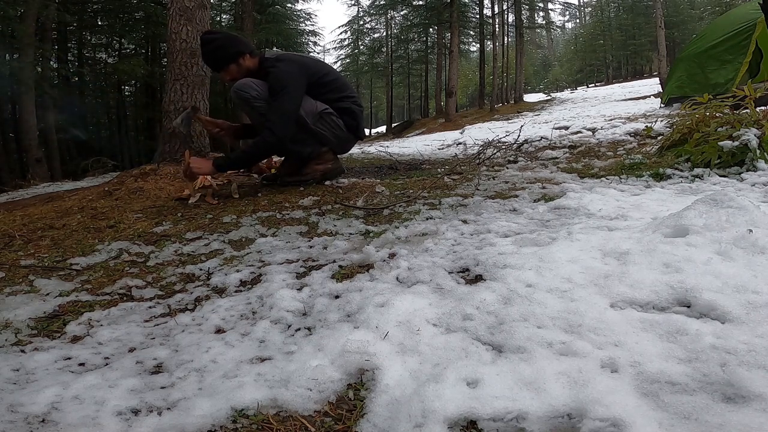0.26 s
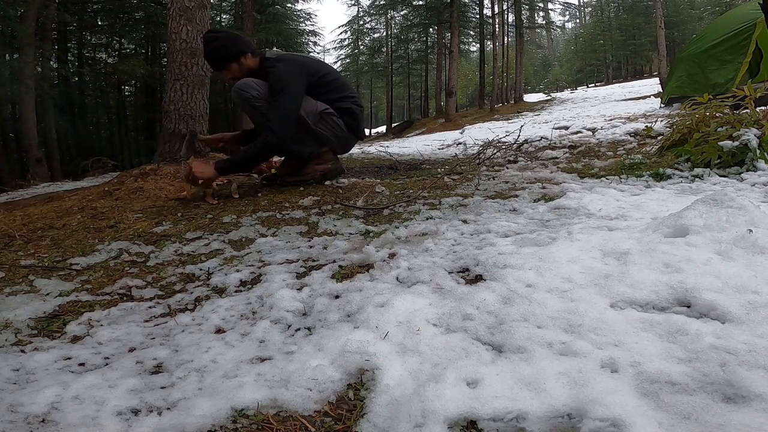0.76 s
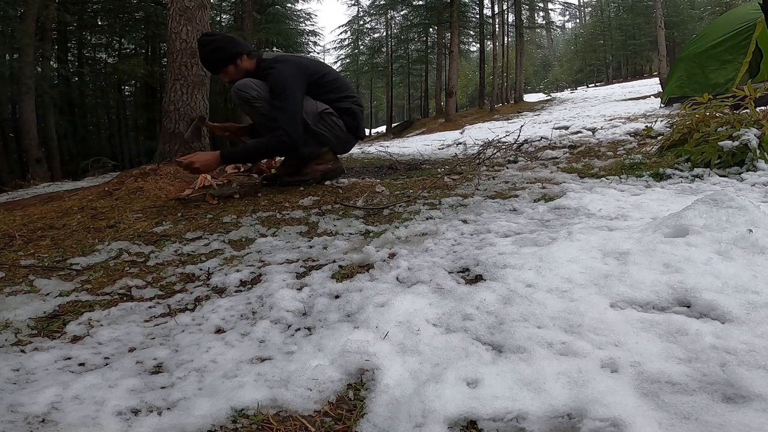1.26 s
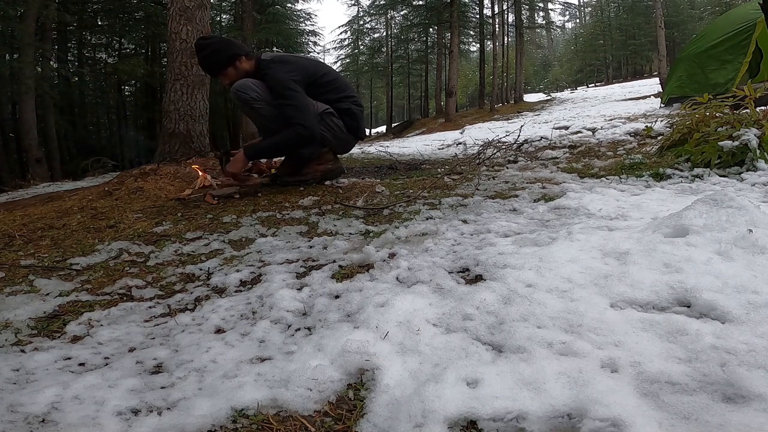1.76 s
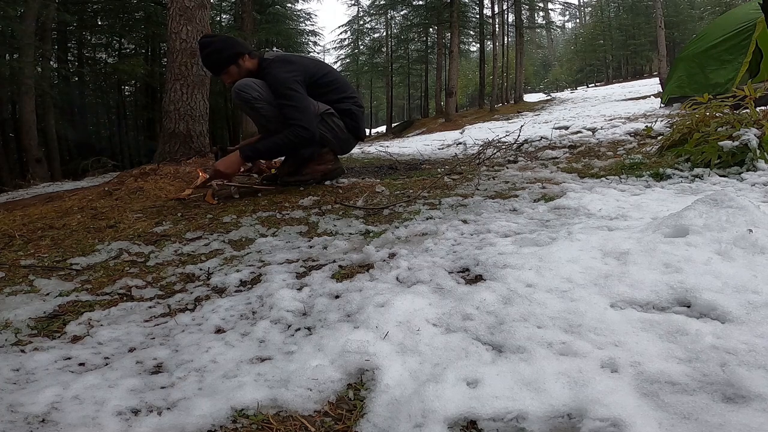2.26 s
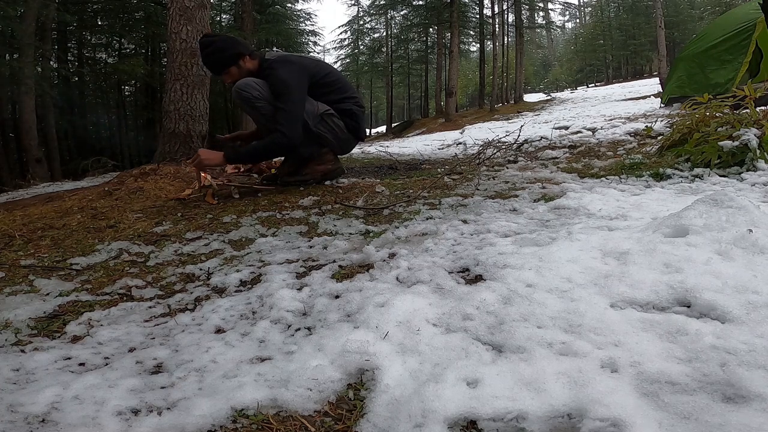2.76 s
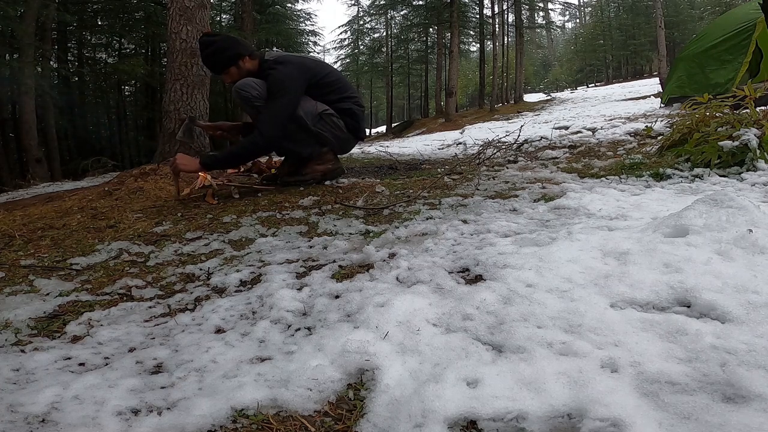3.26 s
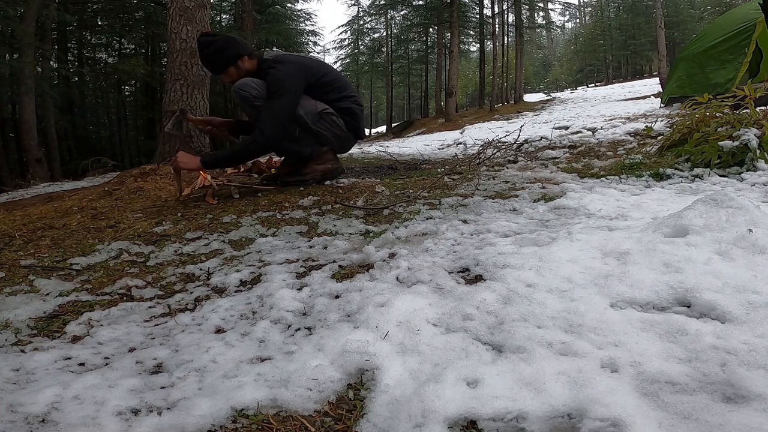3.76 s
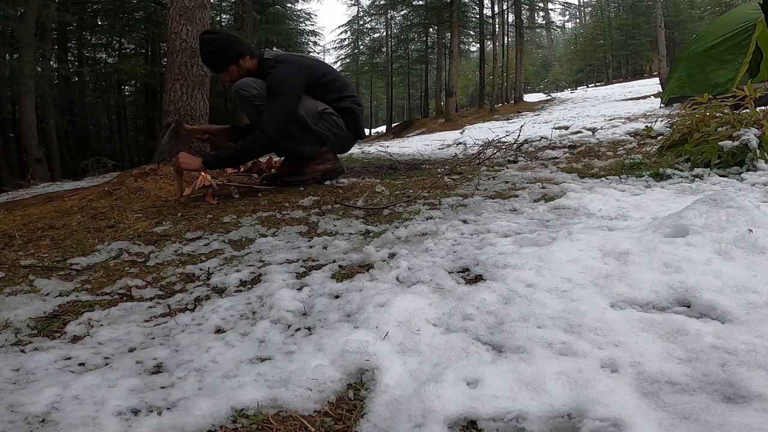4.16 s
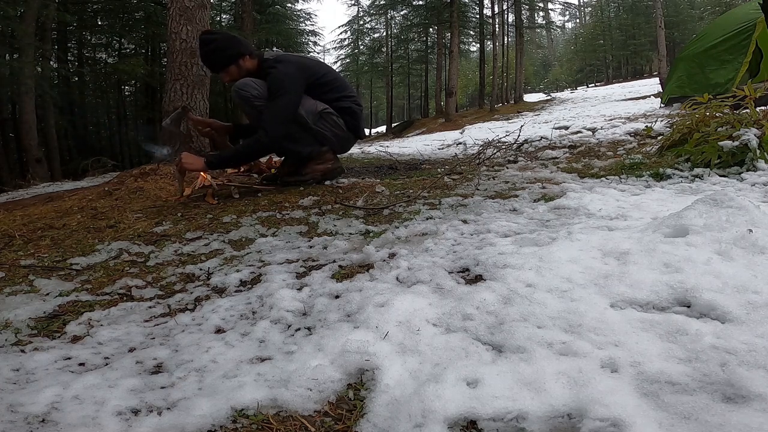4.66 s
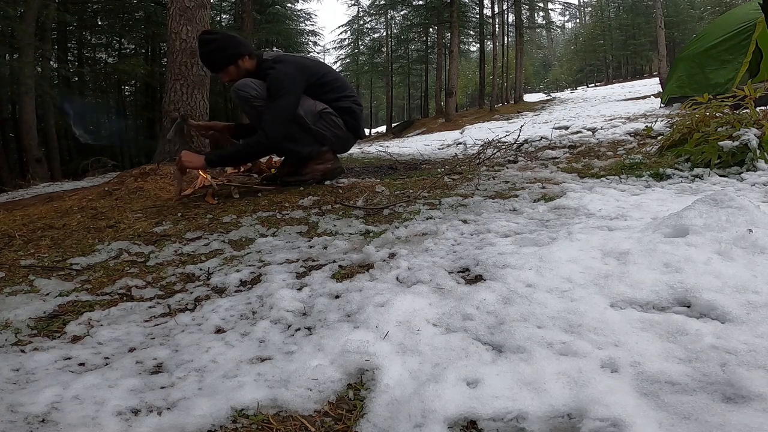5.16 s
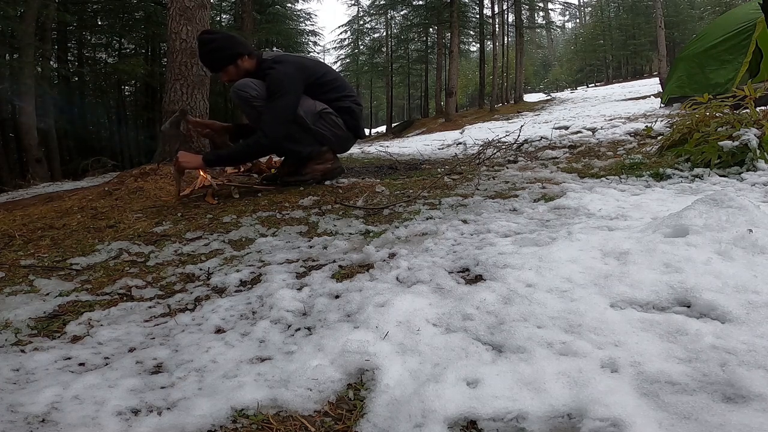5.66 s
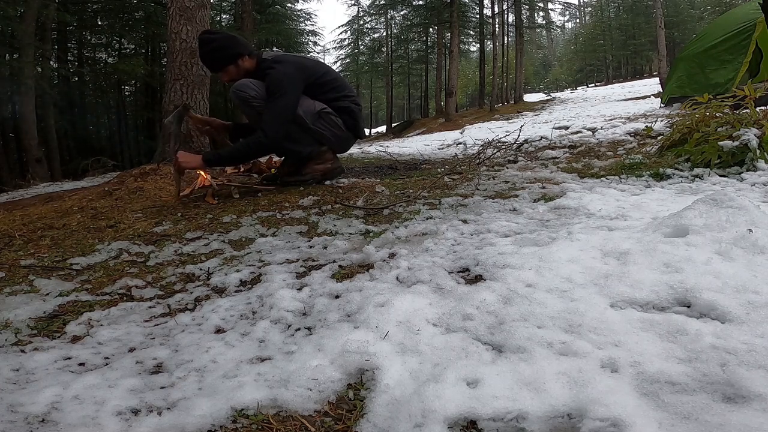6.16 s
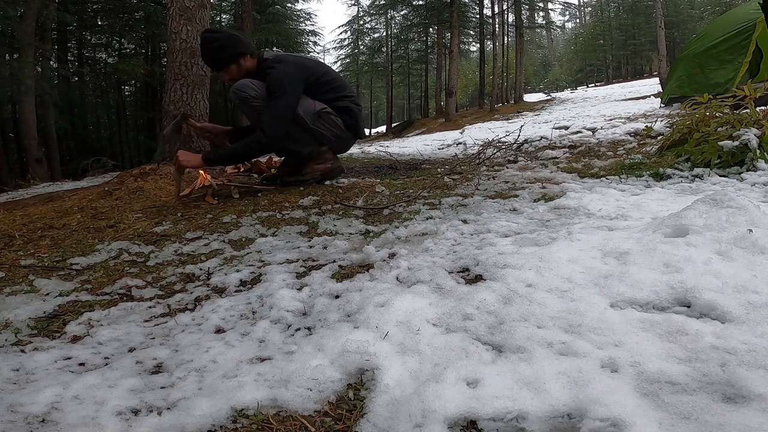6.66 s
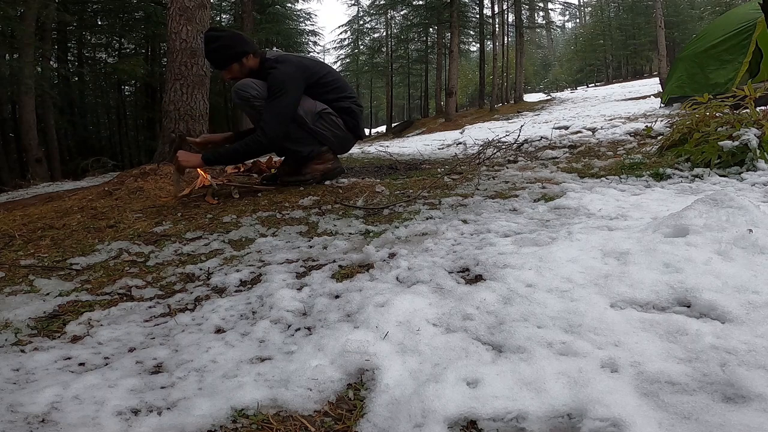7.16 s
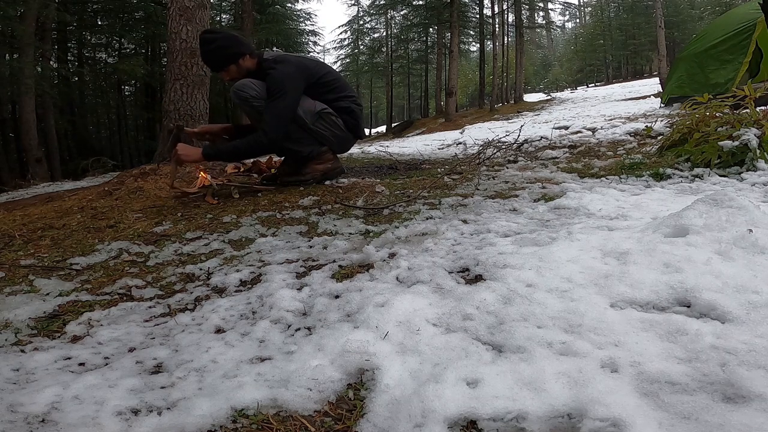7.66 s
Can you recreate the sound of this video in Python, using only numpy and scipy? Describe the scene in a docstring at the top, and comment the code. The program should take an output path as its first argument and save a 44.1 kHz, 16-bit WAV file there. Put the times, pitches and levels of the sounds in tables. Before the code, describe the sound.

Someone chops and snaps dry sticks a few steps from a small stereo microphone in a forest. Sharp cracks with low thumps come early, then a quieter stretch of small ticks and rustling twigs, then a stronger run of blows to the end. Trunks return a brief diffuse echo. A bird chirps briefly, another calls faintly far off, over low wind and rumble.

```python
"""Forest floor: dry sticks are chopped and snapped a few steps from a small two-port microphone.
Each blow is a cluster of filtered noise cracks over damped sine thumps; loose wood knocks and blade or
knocked wood rings high, both in damped modes; gritty noise rustles, faint small cracks and ticks fall
between, and the trunks return a haze of diffuse noise. A near bird chirps in swept sines, a far one in
narrow noise, over wind, low rumble and faint hiss."""
import sys
import numpy as np
from scipy import signal
from scipy.fft import rfft, irfft, next_fast_len
from scipy.io import wavfile
from scipy.ndimage import uniform_filter1d

SR = 44100
rng = np.random.default_rng(int(sys.argv[2]) if len(sys.argv) > 2 else 0)


def unload_wav(signal):
    """Save mono or channel-first audio to the path in sys.argv[1] as 16-bit WAV at rate SR, clipped to [-1, 1]."""
    wavfile.write(
        sys.argv[1],
        SR,
        np.round(np.clip(np.atleast_2d(signal).T, -1, 1) * 32767).astype(np.int16),
    )


N = 349272

# left-right likeness of diffuse sound: freq_hz, likeness (0 to 1)
LIKENESS = [(60, 1), (180, 0.97), (550, 0.43), (1650, 0.087), (4970, 0.052), (15000, 0.045)]
# spectrum of splintering fibres: freq_hz, relative_level_db (per Hz)
SPLINTER_COLOUR = [(2200, -17), (3200, -2.5), (4300, -9), (5300, -4), (6200, -8.5), (7500, -5), (8500, -18),
                   (11000, -12.5), (13000, -25.5), (15000, -41), (16500, -56)]
# spectrum of the woody knock: freq_hz, relative_level_db (per Hz)
KNOCK_COLOUR = [(200, -17.5), (400, 7.5), (1000, -2.5), (2000, -1.5), (2800, -5.5), (3800, -22),
                (8000, -66)]


def gain_of(db):
    """Decibels to amplitude."""
    return 10 ** (np.asarray(db) / 20)


def evened(x):
    """Scales to rms 1."""
    return x / np.sqrt(np.mean(x ** 2) + 1e-20)


def read(points, hz):
    """Reads a table on a log-frequency axis."""
    f, value = np.transpose(points)
    return np.interp(np.log(hz + 1), np.log(f + 1), value)


def add(mix, start_s, sound):
    """Mixes a sound in at start_s."""
    part = mix[round(start_s * SR):][:len(sound)]
    part += sound[:len(part)]


def smoothed(x, bins, frames):
    """Random (frequency, time) grid averaged over bins and frames, rms 1."""
    return evened(uniform_filter1d(uniform_filter1d(x, size=bins, axis=0), size=frames, axis=1))


def coloured(x, db):
    """Filters by a dB curve over rfft bins, minimum phase so nothing sounds early; white noise keeps its rms."""
    log_gain = np.log(gain_of(np.maximum(np.r_[db, db[-2:0:-1]], -100)))
    response = np.exp(np.conj(signal.hilbert(log_gain)))[:len(db)]
    return irfft(rfft(x) * response / np.sqrt(np.mean(abs(response) ** 2)), len(x))


def around(hz, centre_hz, per_octave_db, least_db):
    """A broad hump in dB about a centre, falling with octaves squared."""
    return np.maximum(-per_octave_db * np.log2((hz + 1) / centre_hz) ** 2, least_db)


def diffuse_pair(hz, frames):
    """Random stereo spectra whose left-right likeness follows frequency."""
    a, b, c, d = rng.standard_normal((frames, len(hz), 4)).T
    same = np.clip(read(LIKENESS, hz), -1, 1)[:, None]
    left, other = a + 1j * b, c + 1j * d
    return np.array([left, same * left + np.sqrt(1 - same ** 2) * other])


def background(colour, level, size, patchy_db):
    """Random short-time spectra with drifting patches, following a slow level."""
    frames, hz = N // (size // 4) + 5, np.fft.rfftfreq(size, 1 / SR)
    patches = smoothed(rng.standard_normal((len(hz), frames)), bins=10, frames=8)
    spectra = diffuse_pair(hz, frames) * gain_of(read(colour, hz)[:, None] + patchy_db * patches)
    noise = evened(signal.istft(spectra, nperseg=size, noverlap=size * 3 // 4)[1][:, :N])
    return noise * gain_of(np.interp(np.arange(N) / SR, *np.transpose(level)))


def hiss():
    """Faint hiss: broadband diffuse noise with a slowly moving level."""
    # time_s, level_db
    level = [(0.0, -69.5), (0.86, -71), (1.042, -66), (1.2, -71.5), (2.0, -71), (3.2, -70.5), (4.899, -72),
             (5.9, -73), (6.599, -70.5), (7.92, -73)]
    # freq_hz, relative_level_db (per Hz)
    colour = [(350, -26.5), (600, -6.5), (700, -10), (817, -8.5), (1250, -8.5), (2540, -18), (3590, -18.5),
              (5150, -18), (7100, -13.5), (8610, -27.5), (11600, -30), (13000, -54)]
    return background(colour, level, size=512, patchy_db=1.4)


def rumble():
    """Low rumble: diffuse noise concentrated in the bass."""
    # time_s, level_db
    level = [(0.0, -53.5), (1.56, -56), (1.94, -54), (3.62, -55.5), (4.08, -53.5), (5.56, -55.5),
             (6.17, -54), (6.42, -55.5), (7.92, -56.5)]
    # freq_hz, relative_level_db (per Hz)
    colour = [(65, -35.5), (110, -1), (243, -6), (275, -15), (380, -14), (611, -25), (697, -26.5),
              (900, -43.5), (1170, -65), (1980, -120)]
    return background(colour, level, size=1024, patchy_db=2.0)


def wind():
    """Wind on the housing: deep bass noise that swells in gusts."""
    # time_s, level_db
    level = [(0.0, -53.5), (0.3, -60), (0.789, -53), (1.501, -60.5), (1.96, -52.5), (2.38, -56.5),
             (2.8, -52), (3.502, -51.5), (4.41, -49), (4.76, -55), (5.43, -60.5), (5.67, -57),
             (6.089, -46.5), (6.46, -63), (6.7, -48), (7.1, -53), (7.68, -54.5), (7.92, -52)]
    # freq_hz, relative_level_db (per Hz)
    colour = [(12, -38.5), (20, -7.5), (36, -1), (59, 5.5), (77, -1.5), (120, -11.5), (160, -38.5),
              (260, -120)]
    return background(colour, level, size=2048, patchy_db=-0.5)


def far_bird():
    """Far calls smeared by the trees: narrow noise with a fluttering level."""
    # start_s, length_s, level_db, centre_hz, width_hz
    calls = [(0.123, 0.23, -76.5, 2780, 300), (4.605, 0.26, -83.5, 3080, 608),
             (6.331, 0.18, -75.5, 2990, 499), (6.995, 0.28, -78, 3000, 685), (7.731, 0.077, -83, 2700, 120)]
    out = np.zeros(N)
    for start_s, length_s, level_db, centre_hz, width_hz in calls:
        edges_hz = [centre_hz - width_hz / 2, centre_hz + width_hz / 2]
        band = signal.butter(2, edges_hz, "band", fs=SR, output="sos")
        noise = signal.sosfilt(band, rng.standard_normal(SR))[2000:][:round(length_s * SR)]
        flutter = evened(uniform_filter1d(rng.standard_normal(len(noise)), size=900))
        noise = evened(noise * gain_of(1.4 * flutter))
        add(out, start_s, gain_of(level_db) * noise * signal.windows.tukey(len(noise), .6))
    return out


def near_bird():
    """Short rising-falling whistles: a sine swept along one pitch and level contour."""
    # start_s, level_db, peak_pitch_hz
    chirps = [(1.806, -53.5, 3033.5), (3.806, -55, 3108), (5.502, -56, 3095), (7.254, -56, 3055)]
    # contour of every chirp: time_s (after start), pitch_ratio (to peak pitch), level_db (added)
    contour = [(0, .72, -24), (.005, .82, -7), (.014, .885, 0), (.021, 1.0, -9), (.030, .985, -12),
               (.038, .95, -24), (.048, .88, -9), (.058, .74, -24)]
    out = np.zeros(N)
    time_s, pitch_ratio, contour_db = np.transpose(contour)
    t = np.arange(0, time_s[-1], 1 / SR)
    for start_s, level_db, peak_hz in chirps:
        turns = np.cumsum(peak_hz * np.interp(t, time_s, pitch_ratio)) / SR
        level = gain_of(level_db + np.interp(t, time_s, contour_db))
        add(out, start_s, level * np.sin(2 * np.pi * turns))
    return out


def forest(x, blur, longer):
    """Echoes off many trunks: diffuse noise whose power follows the source, builds over some ms, dies by band."""
    # freq_hz, t60_s (before the factor longer)
    decay = [(150, 0.36), (700, 0.055), (2000, 0.21), (5000, 0.31), (12000, 0.23)]
    # freq_hz, level_db
    colour = [(100, -27.5), (400, -21), (1000, -21.5), (3000, -12), (6000, -18), (12000, -10)]
    hz, _, z = signal.stft(x, SR, nperseg=256, noverlap=192)
    step_s, build_s = 64 / SR, 0.0027
    fall = gain_of(-120 * step_s / (longer * read(decay, hz)))  # acts on power: 60 dB per t60
    build = np.exp(-step_s / build_s)
    power = uniform_filter1d(abs(z) ** 2, size=blur, axis=0)
    power = signal.lfilter([0, 0, 0, 1 - build], [1, -build], power, axis=1)  # three frames late
    power = np.array([signal.lfilter([1 - f], [1, -f], p) for f, p in zip(fall, power)])
    trunks = smoothed(rng.standard_normal(power.shape), bins=24, frames=2)  # single trunks flash wide
    patches = smoothed(rng.standard_normal(power.shape), bins=5, frames=30)  # some bands linger
    grain_db = 3.0 * trunks + 2.5 * patches
    spectra = diffuse_pair(hz, power.shape[1])
    spectra *= np.sqrt(abs(power)) * gain_of(read(colour, hz)[:, None] + grain_db)
    return signal.istft(spectra, SR, nperseg=256, noverlap=192)[1][:, :N]


def rings(rows, rise_s):
    """Damped sine swings that start inwards, each cut at a quarter second."""
    out, t = np.zeros(N), np.arange(SR // 4) / SR
    for start_s, level_db, hz, t60_s in rows:
        envelope = gain_of(level_db - 60 * t / t60_s) * (1 - np.exp(-t / rise_s))
        add(out, start_s, -envelope * np.sin(2 * np.pi * hz * t))
    return out


def struck(modes, hits):
    """A set of damped modes, rung by each hit at its own strengths."""
    rows = []
    for start_s, *levels_db in hits:
        rows += [(start_s, level_db, *mode) for level_db, mode in zip(levels_db, modes)]
    return rings(rows, rise_s=0.00072)


def high_rings():
    """High rings of blade and knocked wood: three damped modes."""
    # freq_hz, t60_s
    modes = [(4050, 0.41), (5240, 0.012), (6810, 0.19)]
    # start_s, then level_db of each mode before rise and decay
    hits = [(.895, -61.5, -70, -75.5), (1.051, -78, -39, -75), (6.056, -75, -70, -64),
            (6.492, -78, -50, -48), (7.333, -77, -15, -59.5)]
    return struck(modes, hits)


def loose_piece():
    """A loose piece of wood, knocked at different spots, so its three modes vary in strength."""
    # freq_hz, t60_s
    modes = [(770, 0.092), (905, 0.078), (2080, 0.043)]
    # start_s, then level_db of each mode before rise and decay
    hits = [(.9365, -50, -65, -56), (1.052, -66, -39.5, -60), (1.0775, -43, -51, -37),
            (1.1215, -70, -70, -48), (1.9185, -45, -44, -65), (1.995, -58, -62, -56),
            (2.166, -65, -64, -54), (5.005, -49, -50, -32), (7.329, -53, -33, -41)]
    return struck(modes, hits)


def rustles():
    """Twigs and bark scraping as they shift: gritty noise in wood colours, fading as the pieces settle."""
    # start_s, length_s (to -19 dB), level_db, splinter_over_knock_db, knock_centre_hz
    scrapes = [(1.054, 0.071, -62, -17.5, 1510), (1.455, 0.068, -75, 4, 1500),
               (1.91, 0.066, -59.5, -7.5, 1500), (1.987, 0.024, -54, -18, 1800),
               (2.171, 0.085, -61.5, -19, 860), (2.406, 0.24, -88, -1, 1200),
               (2.857, 0.087, -81, 2.5, 1197), (4.158, 0.069, -67.5, -4, 803),
               (5.309, 0.024, -75.5, 1.5, 1210)]
    size, rise_s = 8192, 0.0076
    out, hz, t = np.zeros(N), np.fft.rfftfreq(size, 1 / SR), np.arange(size) / SR
    for start_s, length_s, level_db, bright_db, knock_hz in scrapes:
        noise, lumps = rng.standard_normal((2, size))
        grit = evened(noise * gain_of(3.3 * evened(uniform_filter1d(lumps, size=60))))
        grit = grit * (1 - np.exp(-t / rise_s)) * gain_of(level_db - 19.0 * (t / length_s) ** 2)
        knock = coloured(grit, read(KNOCK_COLOUR, hz) + around(hz, knock_hz, 13.0, -6.0))
        splinter = coloured(grit, read(SPLINTER_COLOUR, hz))
        add(out, start_s, knock + gain_of(bright_db) * splinter)
    return out


def thumps():
    """Each blow swings the stick low and an overtone above; the ground answers a moment later."""
    # sticks lying on the ground, levels before rise and decay:
    # start_s, level_db, pitch_hz, t60_s, overtone_db, ground_db
    blows = [(0.0932, -18, 234, 0.041, -90, -24), (.4818, -15.5, 217, 0.059, -62, -28),
             (.876, -25.5, 142, 0.07, -26, -47), (1.966, -33.5, 243, 0.048, -66, -55),
             (4.162, -26, 246.6, 0.025, -54.5, -37), (4.5554, -15.5, 186, 0.024, -43, -23),
             (5.006, -17, 137.4, 0.043, -19.5, -46.5), (5.018, -24, 197, 0.032, -40, -50),
             (5.569, -42.5, 273, 0.044, -35, -40), (5.576, -26, 107, .05, -50, -27),
             (6.041, -16, 129.7, 0.059, -25, -32), (6.48, -11, 129, 0.02, -41, -21),
             (6.8871, -7.5, 191.7, 0.034, -18, -37), (6.9, -27.5, 112, .1, -48, -53),
             (7.3276, -15, 266, 0.032, -25, -49.5), (7.332, -8.5, 212, 0.047, -16.5, -29.5)]
    overtone_ratio, overtone_t60_ratio = 2.3, 0.53
    ground_hz, ground_t60_s, ground_lag_s = 65, 0.061, 0.0098
    rows = []
    for start_s, level_db, hz, t60_s, overtone_db, ground_db in blows:
        rows += [(start_s, level_db, hz, t60_s),
                 (start_s, overtone_db, hz * overtone_ratio, t60_s * overtone_t60_ratio),
                 (start_s + ground_lag_s, ground_db, ground_hz, ground_t60_s)]
    return rings(rows, rise_s=0.00044)


def crack(splinter_db, knock_db, fall_ms, splinter_hz, knock_hz):
    """A lumpy splinter noise burst and a lower knock, starting together and falling 11 dB in fall_ms."""
    size, rise_ms = 2048, 0.54
    hz, t_ms = np.fft.rfftfreq(size, 1 / SR), np.arange(size) / SR * 1000
    splinter, knock, lumps = rng.standard_normal((3, size))
    shape = (1 - np.exp(-t_ms / rise_ms)) * gain_of(-11.0 * (t_ms / max(fall_ms, .5)) ** 1.2)
    lumps = gain_of(4.05 * evened(uniform_filter1d(lumps, size=24)))  # fibres let go unevenly
    splinter_curve_db = read(SPLINTER_COLOUR, hz) + around(hz, splinter_hz, 14.0, -13.0)
    knock_curve_db = read(KNOCK_COLOUR, hz) + around(hz, knock_hz, 4.5, -13.5)
    splinter = coloured(shape * lumps * splinter, splinter_curve_db)
    knock = coloured(shape * knock, knock_curve_db)
    return gain_of(splinter_db) * splinter + gain_of(knock_db) * knock


def ticks():
    """Faint small cracks and ticks at random times, few of them loud."""
    count, base_db, spread_db, fall_ms = 300, -71.5, 3.5, 0.81
    out = np.zeros(N)
    for when, size, tone, dull in rng.random((count, 4)):
        splinter_db = base_db - spread_db * np.log(size + .02)
        knock_db = splinter_db - 8.5 + 12.0 * dull
        tick = crack(splinter_db, knock_db, fall_ms, 4000 + 3500 * tone, 600 + 1400 * dull)
        add(out, when * N / SR, tick)
    return out


def cracks():
    """Wood fibres breaking: one noise burst a crack, clustered at the blows."""
    # start_s, splinter_db, knock_db, fall_ms, splinter_centre_hz, knock_centre_hz
    breaks = [(0.09, -39.5, -32, 4.8, 5750, 1260), (0.0958, -38.5, -54, 3.9, 5040, 630),
              (0.209, -54.5, -60, 3.9, 3140, 1960), (0.375, -55, -73, 1.8, 4900, 770),
              (0.428, -49, -72, 1.5, 6800, 530), (0.479, -23.5, -22.5, 2.9, 4940, 1240),
              (0.484, -22, -26, 2.2, 5660, 1250), (0.4873, -24.5, -27, 3.3, 5540, 875),
              (0.540, -45, -60, 1.7, 7150, 1500), (0.7195, -37, -67, 1.05, 6150, 980),
              (0.732, -46.5, -52.5, 2.3, 5140, 1150), (0.857, -58, -51, 2.9, 3500, 920),
              (0.867, -39, -38, 1.1, 3500, 1210), (0.8732, -39.5, -30.5, 9.4, 4100, 1170),
              (0.8778, -16, -18, 2.7, 5060, 1860), (0.936, -42.5, -48, 1.8, 7000, 1520),
              (1.049, -33, -32, 5.4, 4540, 1400), (1.077, -48, -33, 4.4, 3940, 1760),
              (1.1097, -50.5, -58, 2.3, 3700, 2300), (1.1214, -74, -51.5, 4.2, 4460, 1730),
              (1.1824, -73, -48.5, 1.9, 3670, 1950), (1.2674, -53.5, -52, 2.1, 4260, 1218),
              (1.4488, -40.5, -56, 1.95, 5500, 1750), (1.5948, -60, -72.5, 2.1, 9500, 570),
              (1.7245, -54, -52, 2.8, 8360, 970), (1.784, -56, -52.5, 1.9, 5900, 1330),
              (1.9172, -47.5, -37.5, 4.5, 5700, 1264), (1.9638, -55, -73, 3.5, 6600, 620),
              (1.9864, -64, -53, 4.3, 4040, 860), (2.1161, -56.5, -52, 2.7, 4830, 1323),
              (2.1645, -54.5, -49.5, 5.2, 6100, 1220), (2.2105, -69, -61, 3.9, 5230, 834),
              (2.5027, -49.5, -51.5, 3.5, 6080, 656), (2.596, -42.5, -54.5, 1.76, 5400, 1284),
              (2.749, -62, -74, 5, 5800, 990), (2.806, -62, -74.5, 3.6, 5750, 597),
              (2.9937, -63, -53, 1.7, 4400, 1420), (3.0187, -58, -53, 2, 5080, 1230),
              (3.132, -61, -56, 3.4, 4270, 1890), (3.271, -58.5, -49.5, 2.7, 5200, 522),
              (3.2964, -64, -63, 3.9, 6360, 750), (3.31, -64.5, -62.5, 3.6, 4000, 830),
              (3.329, -62.5, -50, 1.8, 6600, 660), (3.3918, -61.5, -69, 2, 4420, 800),
              (3.4538, -59, -56, 1.6, 4220, 830), (3.561, -51.5, -73.5, 1.9, 5500, 734),
              (3.6273, -57, -45.5, 1.23, 4550, 1510), (3.721, -62.5, -61, 5, 4000, 2580),
              (3.9493, -50.5, -57.5, 2.04, 5530, 1450), (4.129, -47.5, -34.5, 2.5, 3800, 1374),
              (4.1535, -42, -53, 3.4, 5540, 1160), (4.1585, -44.5, -33.5, 4.9, 4050, 1640),
              (4.1676, -45.5, -49, 6.7, 5700, 789), (4.3116, -58.5, -75.5, 1.4, 6970, 600),
              (4.341, -56.5, -74, 2.4, 5700, 470), (4.5537, -28.5, -25.5, 2.74, 5300, 1150),
              (4.997, -37.5, -37.5, 12.2, 5400, 670), (5.0014, -58, -24.5, 2.4, 4040, 1060),
              (5.0045, -14.5, -17, 2.7, 5420, 1640), (5.0097, -19, -53, 1.3, 5640, 1860),
              (5.019, -29, -53, 4.1, 5100, 2220), (5.149, -55.5, -75, 6, 4630, 650),
              (5.1721, -52.5, -59, 10.5, 5200, 1240), (5.189, -51.5, -85, 1.4, 6360, 1040),
              (5.2155, -61, -56, 4.6, 3820, 1900), (5.353, -55, -57, 1.46, 6250, 761),
              (5.5213, -51.5, -53, 3.1, 3560, 2580), (5.54, -56.5, -71, 1.6, 7860, 2040),
              (5.5672, -32, -35, 5.3, 4200, 1420), (5.5714, -37.5, -43, 2.14, 5400, 1190),
              (6.0373, -37.5, -34.5, 7.3, 5600, 780), (6.0519, -38.5, -37, 4.2, 4440, 1340),
              (6.1264, -50.5, -73, 1.36, 6000, 2040), (6.2191, -49.5, -74, 1.9, 5100, 800),
              (6.302, -58, -55.5, 3.5, 4560, 1510), (6.475, -24, -32, 2.43, 4700, 1080),
              (6.477, -30, -10.5, 1.68, 4100, 760), (6.484, -45, -54, 16, 5670, 635),
              (6.4897, -22, -26, 1.54, 5030, 1580), (6.634, -54, -58, 4.1, 5400, 1600),
              (6.71, -56, -71, 1.5, 9300, 2020), (6.7504, -51.5, -63, 2.1, 5670, 1294),
              (6.874, -56.5, -43, 7.6, 4500, 990), (6.885, -20, -11, 1.6, 5000, 943),
              (6.8879, -17.5, -21.5, 3, 5900, 920), (7.1754, -57, -78.5, 2.3, 5040, 1059),
              (7.2702, -54, -76, 0.95, 5800, 1510), (7.3245, -29, -23, 3.9, 5100, 1476),
              (7.3272, -19, -15.5, 2.97, 4920, 1060), (7.3331, -26, -16.5, 2.1, 5240, 715),
              (7.347, -38, -51, 1.2, 4960, 730), (7.434, -58.5, -54, 1.6, 6240, 1133),
              (7.4645, -67, -58.5, 2.4, 3970, 2020), (7.608, -47, -68, 1.04, 6100, 680)]
    out = np.zeros(N)
    for start_s, *settings in breaks:
        add(out, start_s, crack(*settings))
    return out


def ports(x):
    """The two openings hear a source on the left with different level and phase by frequency."""
    # freq_hz, left_over_right_db
    balance = [(60, 1), (120, 0.5), (240, 0.5), (480, 1.0), (950, 1), (1890, 2), (3770, 6.5), (7520, -2),
               (15000, -13)]
    # freq_hz, left_lead_rad
    lead = [(300, 0), (2000, -.3), (3000, -.6), (5200, -.3), (7500, -.8), (9200, .1), (10200, .6),
            (12500, .9)]
    size = next_fast_len(N)
    hz = np.fft.rfftfreq(size, 1 / SR)
    half = gain_of(read(balance, hz) / 2) * np.exp(.5j * read(lead, hz))
    return irfft(rfft(x, size) * np.array([half, 1 / half]), size)[:, :N]


def scene():
    """Wood on the left, the near bird to the right, background all round."""
    air = (wind() + rumble()) * gain_of([[.4], [-.4]]) + hiss()
    far, near = far_bird(), near_bird()
    wood = high_rings() + loose_piece() + rustles() + thumps() + ticks() + cracks()
    echoes = forest(wood, blur=7, longer=1)
    echoes = echoes + gain_of(12.0) * forest(near, blur=1, longer=1.8)
    birds = near * gain_of([[-1.5], [1.5]]) + far * gain_of([[.1], [-.1]])
    return ports(wood) + birds + echoes + air


def record(dry):
    """The microphone loses the deepest bass; then the band limit."""
    bass_hz, edge_hz = 35.0, 16420
    dry = signal.sosfilt(signal.butter(2, bass_hz, "high", fs=SR, output="sos"), dry)
    lowpass = signal.firwin(511, edge_hz, window=("kaiser", 9), fs=SR)
    return signal.oaconvolve(dry, lowpass[None], "same")


dry = scene()
out = record(dry)
unload_wav(out)
```